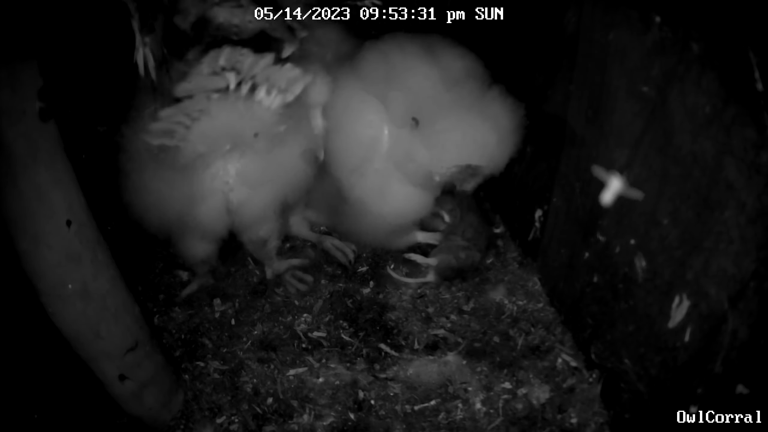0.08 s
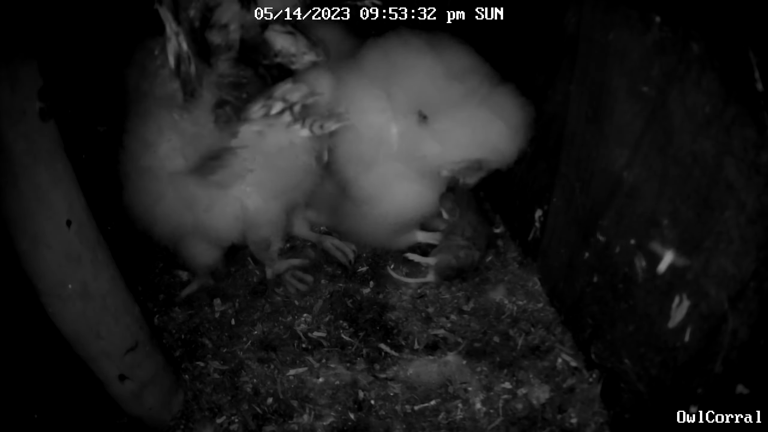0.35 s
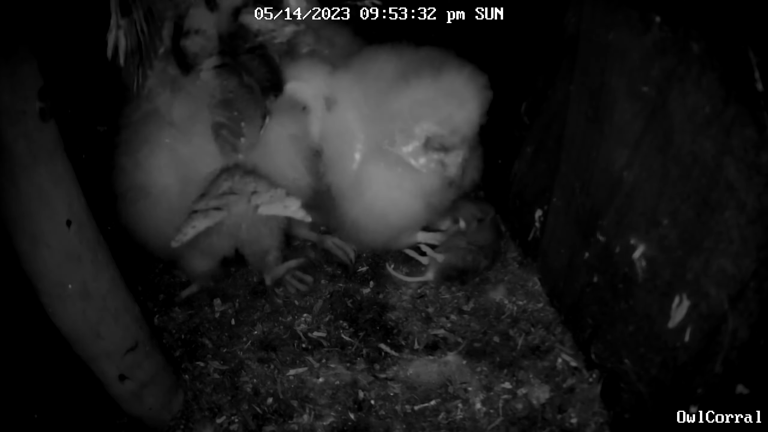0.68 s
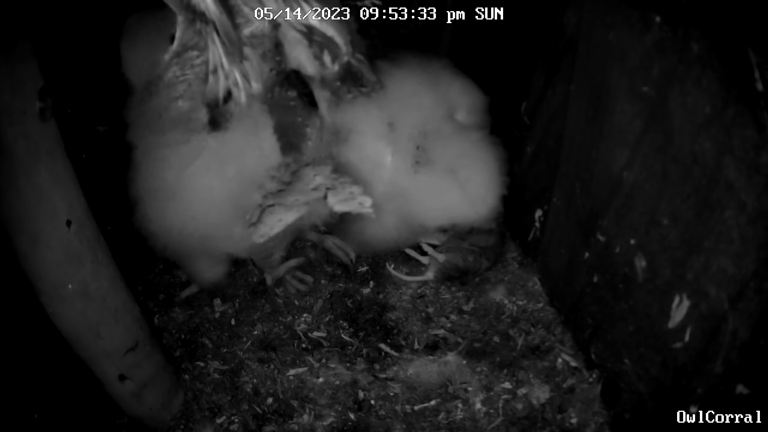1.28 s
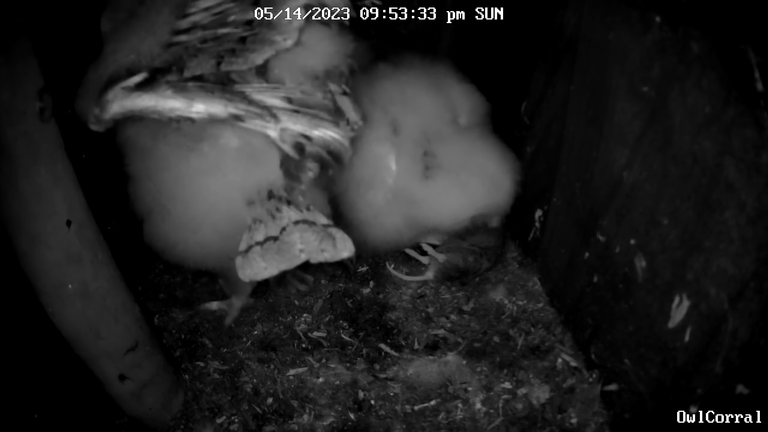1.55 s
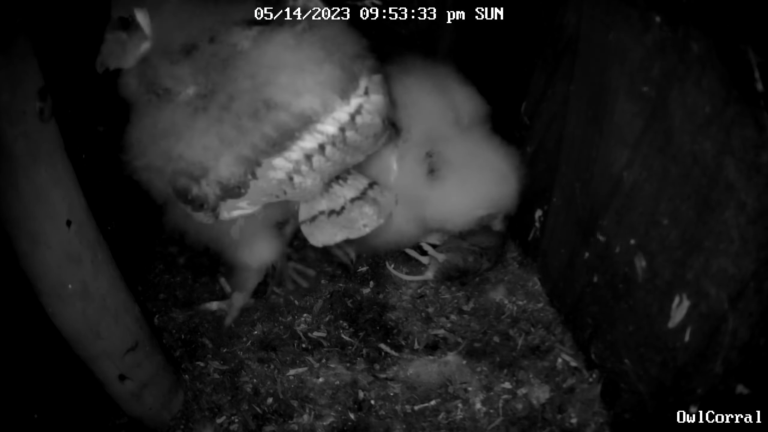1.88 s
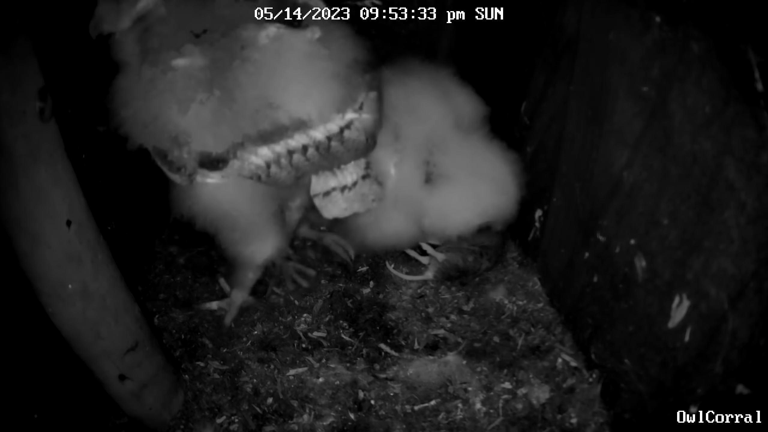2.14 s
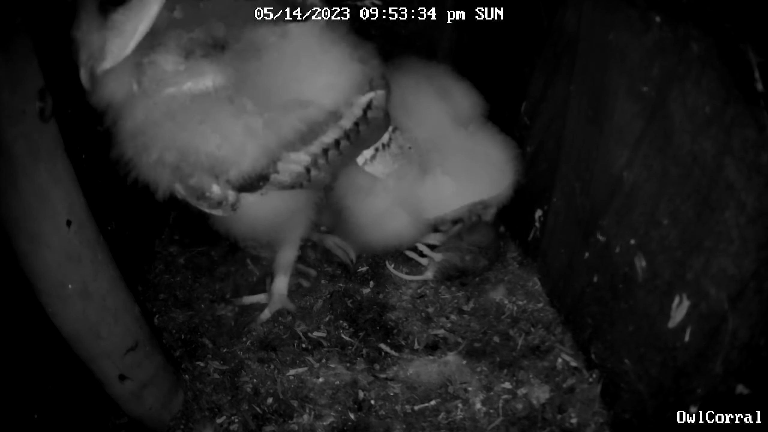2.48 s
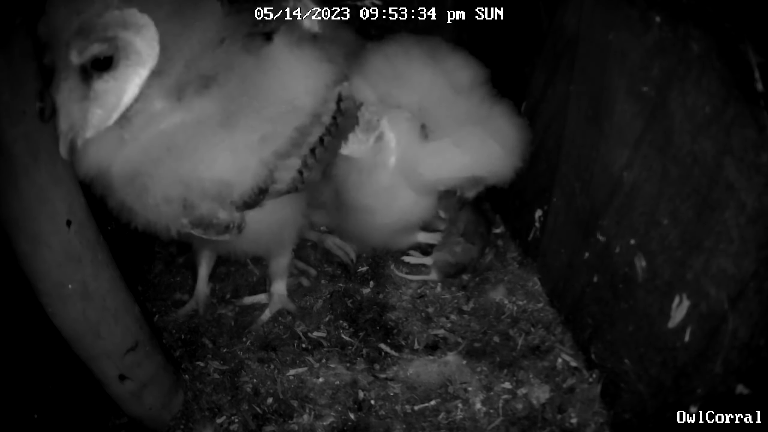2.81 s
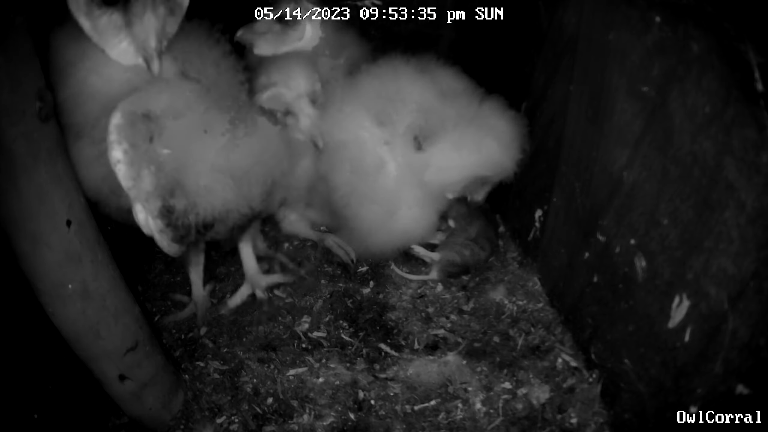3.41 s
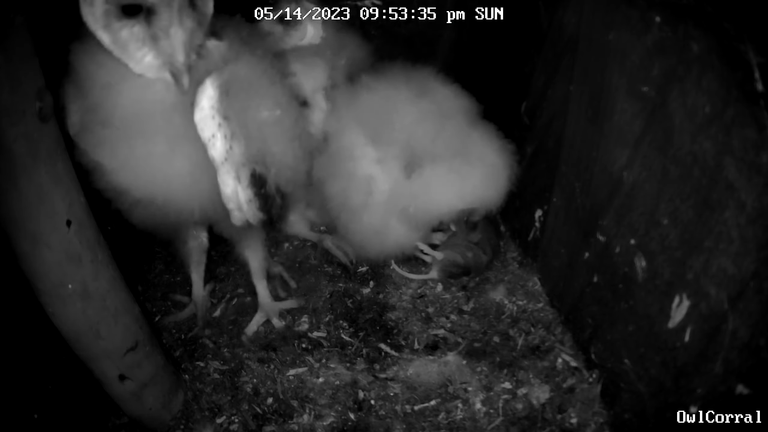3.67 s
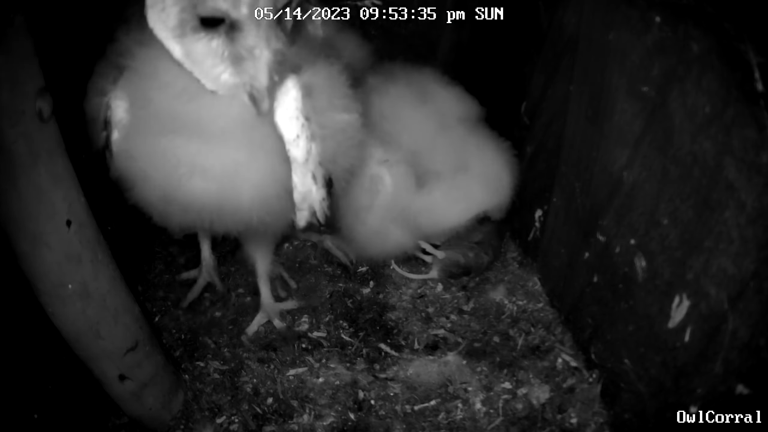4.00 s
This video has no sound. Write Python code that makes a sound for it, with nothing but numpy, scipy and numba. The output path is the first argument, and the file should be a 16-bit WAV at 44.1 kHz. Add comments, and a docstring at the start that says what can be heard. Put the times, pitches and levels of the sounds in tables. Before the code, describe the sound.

Heard close up in a wooden nest box, young owls make three breathy, rasping hisses: a brief shrill one, a longer shrill one that builds and stops sharply, then a hoarser one. Hollow thumps and small claw clicks are scattered around them as the birds shuffle, loudest in the middle. Faint, brief whistles and a soft low rumble lie underneath.

```python
"""Three rasping hisses: two barn owlets beg at night in a wooden nest box, close to a small microphone.
Each hiss is rough air ringing in the throat; its middle resonances sink as the beak shuts.
The box makes some pitches louder and others softer. Feet thump the floorboard and claws tick on it.
Brief whistles and thin rasps come and go, over a low rumble and a faint steady hiss."""
import sys
import numpy as np
from scipy import signal
from scipy.fft import rfft, irfft
from scipy.io import wavfile
from numba import njit

SR = 44100
rng = np.random.default_rng(int(sys.argv[2]) if len(sys.argv) > 2 else 0)


def unload_audio(sound):
    """Save the sound as a 16-bit wav file, at the path given as the first command line argument."""
    columns = np.transpose(np.atleast_2d(sound))
    # keep every value between -1 and 1, then stretch to whole-number steps
    steps = np.round(np.clip(columns, -1, 1) * 32767)
    wavfile.write(sys.argv[1], SR, steps.astype(np.int16))


N = 178119
T = np.arange(N) / SR


def undb(db):
    """Turn decibels into a number to multiply by."""
    return 10 ** (np.asarray(db) / 20)


def band_rms(x, lo_hz, hi_hz):
    """The average strength (rms) of x between two frequencies."""
    hz = np.fft.rfftfreq(len(x), 1 / SR)
    return np.std(irfft(rfft(x) * ((hz > lo_hz) & (hz < hi_hz))))


def butter(x, hz, kind, order=2):
    """Keep the lows, the highs or a band; a higher order cuts more sharply."""
    return signal.sosfilt(signal.butter(order, hz, kind, fs=SR, output="sos"), x)


def flutter(hz):
    """A random wobble of typical size 1, up to about hz times a second."""
    x = butter(rng.standard_normal(N), hz, "low")
    return x / x.std()


def add(out, start_s, sound):
    """Mix a short sound in at a given time."""
    i = int(np.clip(start_s * SR, 0, N - 1))
    out[i:i + len(sound)] += sound[:N - i]


@njit
def resonate(x, hz, width):
    """A resonance: it lets through the pitches near hz, and its centre and width can move."""
    y, band_state, low_state = np.empty(len(x)), 0., 0.
    for i in range(len(x)):
        tuning, damping = np.tan(np.pi * hz[i] / SR), width[i] / hz[i]
        band = (band_state + tuning * (x[i] - low_state)) / (1 + tuning * (tuning + damping))
        band_state = 2 * band - band_state
        low_state += 2 * tuning * band
        y[i] = damping * band
    return y


def blown(hz, width_hz):
    """Rushing air: noise through the same resonance twice, for a steep-sided band."""
    centre, span = hz * np.ones(N), width_hz * np.ones(N)
    return resonate(resonate(rng.standard_normal(N), centre, span), centre, span)


def background(drone_hz=111, boom_hz=82, boom_db=-8, rumble_db=-43, fade_db_per_s=4, air_db=-75):
    """Faint steady hiss and a low rumble that slowly fades, swelling when the birds shuffle."""
    # The tone of the steady noise. Each row: frequency in Hz, relative level in dB.
    air_curve = [(12, -32), (20, 0.5), (54, -18.5), (117, 5), (139, -8.5), (194, -34), (316, -22.5),
                 (397, -31), (715, -37.5), (6770, -47.5), (8970, -59.5), (11700, -95.5), (19700, -120)]
    # Soft shuffles. Each row: start in seconds, length in seconds, level in dB.
    shuffles = [(1.258, 0.23, -34.5), (1.427, 0.12, -36), (3.13, .18, -45), (3.418, 0.11, -48),
                (3.83, 0.13, -46)]
    hz, db = np.transpose(air_curve)
    bins_hz = np.fft.rfftfreq(N, 1 / SR)
    curve_db = np.interp(np.log(bins_hz + 1), np.log(hz), db)
    air = irfft(rfft(rng.standard_normal(N)) * undb(curve_db), N)
    rumble = blown(drone_hz, width_hz=18) + undb(boom_db) * blown(boom_hz, width_hz=23)
    swell = undb(rumble_db - fade_db_per_s * T)
    for start_s, length_s, shuffle_db in shuffles:
        add(swell, start_s, undb(shuffle_db) * np.hanning(int(length_s * SR)))
    return undb(air_db) * air / band_rms(air, 1000, 8020) + swell * rumble / rumble.std()


def thin_rasps(hz=2500, width_hz=330, flicker_db=4):
    """Very faint rasps between the calls: a narrow band of flickering noise swells and fades."""
    # Each row: start in seconds, length in seconds, level in dB.
    rasps = [(0.754, 0.25, -74), (2.125, 0.053, -71), (2.212, .1, -64.5), (3.556, 0.55, -81.5)]
    air = blown(hz, width_hz) * undb(flicker_db * flutter(30))
    swell = np.zeros(N)
    for start_s, length_s, db in rasps:
        add(swell, start_s, undb(db) * np.hanning(int(length_s * SR)))
    return swell * air / air.std()


def whistles(rough=0.15):
    """Brief sliding whistles, made husky by a wobble in pitch and loudness."""
    # Each row: start in seconds, length in seconds, first and last pitch in Hz, level in dB.
    glides = [(0.265, 0.026, 3570, 4550, -52.5), (0.324, 0.013, 4110, 3660, -46),
              (0.326, 0.087, 3860, 3750, -70), (2.336, 0.015, 4470, 4670, -63),
              (2.34, .025, 5630, 6750, -62.5), (1.255, 0.0264, 4580, 3920, -42.5),
              (1.265, 0.15, 4560, 4430, -41), (2.584, 0.021, 4800, 3100, -43)]
    out = np.zeros(N)
    for start_s, length_s, first_hz, last_hz, db in glides:
        n = int(length_s * SR)
        phase = 2 * np.pi * np.cumsum(np.linspace(first_hz, last_hz, n)) / SR
        tone = np.sin(phase + 2 * rough * flutter(99)[-n:])
        tone *= 1 + rough * flutter(300)[-n:]
        add(out, start_s, undb(db) * np.hanning(n) * tone)
    return out


def claws(scrape_s=0.0028, grit=0.37, crack=0.4, top_hz=3800, reach_hz=170):
    """A claw tip skids for a few milliseconds, making a tiny crack and ringing the wood."""
    # Claw strikes. Each row: start in seconds, peak level in dB, brightness in dB per octave.
    strikes = [(0.204, -37, 20), (0.227, -56, 11), (0.383, -44.5, 1.5), (0.449, -53, 16),
               (0.607, -30, -2.5), (0.904, -27, 0), (1.947, -52, 4), (2.173, -31, -8), (2.181, -30, -5.5),
               (2.189, -35, -14), (2.266, -38.5, 1), (2.509, -53.5, 3), (3.327, -46.5, 2.5),
               (3.338, -36, -22), (3.355, -43, -9), (3.364, -42.5, -7), (3.993, -52, 11.5)]
    # The wood's tones. Each row: pitch in Hz, relative level in dB, seconds to fade by 60 dB.
    wood_tones = [(709, -6.5, 0.065), (882, -11, 0.026), (1064, -1.5, 0.056), (1194, 3, 0.039),
                  (1540, 3, 0.026), (1780, -3.5, 0.012), (2055, 8, 0.0094), (2256, -5.5, 0.035),
                  (2607, 1.5, 0.014), (3010, 1, 0.012), (3760, -12.5, 0.051), (4250, -1.5, 0.0076)]
    out, t = np.zeros(N), T[:SR // 8]
    octaves = np.log2(np.clip(np.fft.rfftfreq(len(t), 1 / SR), 500, 8000) / 2000)
    for start_s, db, brightness in strikes:
        skid = grit * rng.standard_normal(len(t)) * np.exp(-t / scrape_s)
        skid[0] += 2  # the first hit
        ring = sum(np.sin(2 * np.pi * (hz * t + rng.random())) * undb(tone_db - 60 * t / fade_s)
                   for hz, tone_db, fade_s in wood_tones)
        ring += crack * butter(rng.standard_normal(len(t)), [800, 4500], "band") * undb(-60 * t / 0.015)
        tick = signal.fftconvolve(skid, ring)[:len(t)]
        tick = irfft(rfft(tick) * undb(brightness * octaves), len(t)) * np.linspace(1, 0, len(t))
        # a sharper contact reaches further into the treble
        cutoff_hz = min(top_hz + reach_hz * max(brightness, 0), 9000)
        tick = butter(tick, cutoff_hz, "low", order=6)
        add(out, start_s, undb(db) * tick / np.abs(tick).max())
    return out


def footfalls():
    """A padded foot pushes the floorboard; a shorter contact rings its higher tones."""
    # Steps. Each row: start in seconds, peak level in dB, contact time in milliseconds.
    steps = [(.182, -21.5, 1.74), (0.208, -25.5, 1), (0.234, -23, 2.9), (0.46, -34.5, 4.5),
             (.609, -22.5, 6.5), (0.907, -16.5, 8.3), (1.144, -46, 0.94), (1.948, -7.5, 7.2),
             (2.028, -22, 19.6), (2.181, -22, 1.66), (2.274, -19.5, 2.3), (2.445, -40.5, 2.6),
             (2.783, -18, 3.1), (2.789, -6, 7.9), (3.333, -21, 6.9), (3.434, -43, 15), (3.986, -25, 2.8),
             (3.999, -15, 5.7)]
    # The board's tones. Each row: pitch in Hz, relative level in dB, seconds to fade by 60 dB.
    board_tones = [(73, -15.5, 0.52), (90.2, -5, 0.26), (110.8, 0, 0.2115), (136.7, -1, 0.1),
                   (161.2, -8, 0.15), (237, -3.5, 0.083), (265.5, -6, 0.13), (308.9, 1, 0.089),
                   (395.4, -13, 0.16), (406, -21.5, 0.2), (459.6, -8.5, 0.13), (687, -11.5, 0.071)]
    out, t = np.zeros(N), T[:SR // 2]
    ring = sum(np.sin(2 * np.pi * hz * t) * undb(db - 60 * t / fade_s) for hz, db, fade_s in board_tones)
    ring = butter(ring, 65, "high", order=10)  # the small board gives no deep bass; its lows come late
    for start_s, db, contact_ms in steps:
        progress = t / (contact_ms / 1000)
        push = progress ** 2 * np.exp(-6 * progress)
        thump = signal.fftconvolve(ring, push)[:len(t)]
        add(out, start_s, undb(db) * thump / np.abs(thump).max())
    return out


def at_microphone(x, path, size=4096):
    """The ringing box lifts some pitches and dips others; the microphone softens the high treble."""
    hz = np.fft.rfftfreq(size, 1 / SR)
    curve_db = sum(db * np.exp(-((hz - centre_hz) / width_hz) ** 2) for centre_hz, width_hz, db in path)
    # turn the curve into a ring that follows the sound and never comes before it (minimum phase)
    cepstrum = irfft(np.log(undb(curve_db)))
    cepstrum[1:size // 2] *= 2
    cepstrum[size // 2 + 1:] = 0
    ring = irfft(np.exp(rfft(cepstrum)))
    return signal.fftconvolve(x, ring)[:N]


def breath(start_s, shut_s, tail_db, tail_s, attack_s=0.0042, swell_s=0.32, closing_s=0.055, stop_s=0.007):
    """Curves from 0 to 1: the bird pushes harder, holds, then shuts its beak and a little air leaks."""
    effort = np.clip(0.032 + (T - start_s) / swell_s, 1e-3, 1)
    closed = np.clip((T - shut_s) / closing_s + 1, 0, 1)
    stopped = np.clip((T - shut_s) / stop_s, 0, 1)
    onset = np.clip((T - start_s) / attack_s, 0, 1)
    tail = np.clip(1 - (T - shut_s) / tail_s, 0, 1) ** 0.71
    flow = onset * undb(tail_db * stopped) * tail
    return effort, closed * (flow > 0), stopped, flow


def hiss(throat, path, start_s, treble_on_s, shut_s, db, treble_db, grunt_db, tail_db, tail_s,
         sink_to_hz=1350, low_db=-44, shut_middle_db=-10, shut_treble_db=-19, leak_db=4, grunt_s=0.015):
    """One begging call: air rasps through the low, middle and high resonances of the throat."""
    effort, closed, stopped, flow = breath(start_s, shut_s, tail_db, tail_s)
    sink = 0.77 * closed ** 1.4
    drift = 1 + 0.006 * flutter(28)
    spurts = undb(0.16 * flutter(420))  # the airflow is slightly uneven

    def ring(resonances, pull=0):
        """Air through some resonances; the shutting beak pulls them down and widens them."""
        widen = 1 + 0.83 * pull
        air = sum(undb(level_db) * blown(drift * (hz + pull * (sink_to_hz - hz)), width_hz * widen)
                  for hz, width_hz, level_db in resonances)
        return spurts * air / np.sqrt(widen)

    def gain_for(air, level_db, band_hz):
        """The gain that brings a band of this air to a level at the microphone."""
        return undb(level_db) / band_rms(at_microphone(air, path), *band_hz)

    low, mouth, high = ring(throat[:1]), ring(throat[1:2], sink), ring(throat[4:])
    middle = ring(throat[2:3], sink) + (1 - sink) * ring(throat[3:4])
    middle_gain = gain_for(mouth + middle, db + shut_middle_db * closed, (1000, 3700))
    high_gain = gain_for(high, db + treble_db + shut_treble_db * closed, (3800, 9000))
    # the low resonances grow least with effort
    out = low * effort ** 0.14 * gain_for(low, low_db, (370, 600))
    out += (mouth * effort ** 0.55 + middle * effort) * middle_gain
    out += high * effort ** 0.97 * high_gain * undb(leak_db * stopped)  # leaking air sounds thinner
    # the narrowing throat grunts just as the beak shuts
    grunt = spurts * blown(420 * drift, width_hz=150)
    grunt_swell = np.exp(-((T - shut_s) / grunt_s + 0.5) ** 2)
    out += grunt * grunt_swell * gain_for(grunt, grunt_db, (370, 600))
    # the camera's sound is muffled above 4.6 kHz at first, then the treble switches on abruptly
    muffled = butter(out, 4600, "low", order=36)
    return at_microphone(flow * np.where(T < treble_on_s, muffled, out), path)


def owlets():
    """A shrill owlet and a hoarse one hiss, each from its own place in the box."""
    # Throat resonances. Each row: centre in Hz, width in Hz, relative level in dB.
    shrill_throat = [(355, 345, -17), (1605, 560, -11), (2450, 560, 0), (3050, 1100, -4), (4405, 200, 3),
                     (5125, 985, -3), (7030, 540, -6)]
    hoarse_throat = [(400, 375, -17), (1495, 440, -8), (2290, 475, 0), (3295, 770, -4), (4140, 1620, -12),
                     (5725, 1880, -13), (6830, 215, -8)]
    # The box's peaks and dips; the last row is the microphone's treble roll-off.
    # Each row: centre in Hz, width in Hz, lift or cut in dB.
    shrill_path = [(305, 35, 4), (475, 50, 6), (680, 35, -12), (840, 80, 9), (1010, 55, -2), (1180, 55, 9),
                   (1425, 40, -5), (1505, 55, 3), (1890, 50, -3), (2230, 55, 1), (2420, 60, -5),
                   (2685, 70, -14), (2975, 65, 4), (3115, 50, -5), (3195, 50, 4), (3395, 45, -10),
                   (3550, 55, 3), (3670, 50, -5), (3770, 55, 4), (3875, 50, 5), (4680, 70, 7),
                   (5175, 70, -7), (5840, 70, 7), (6335, 65, -6), (7200, 55, -7), (7845, 85, 11),
                   (8155, 80, 11), (9215, 865, -6)]
    hoarse_path = [(315, 35, 8), (470, 40, 6), (710, 50, -12), (855, 115, 10), (1045, 35, -5),
                   (1200, 35, 7), (1265, 45, -5), (1350, 55, 4), (1435, 50, -5), (1545, 70, 4),
                   (1900, 50, -4), (2715, 65, -16), (2925, 55, 2), (3095, 60, -6), (3745, 60, -4),
                   (3920, 65, 6), (4080, 60, -6), (4360, 55, -6), (5115, 55, 4), (5310, 55, 5),
                   (5450, 55, -8), (5840, 65, 6), (6475, 50, -9), (6655, 50, -6), (7375, 50, 5),
                   (7825, 90, 7), (8170, 80, 7), (9155, 820, -17)]
    # Each row: which owlet; when the call starts, the camera's treble switches on and the beak shuts,
    # in seconds; middle level, treble relative to it, grunt level and tail drop, in dB; tail in seconds.
    calls = [("shrill", -.33, -.27, 0.16, -20.5, 4, -34, -11, .052),
             ("shrill", 1.267, 1.329, 1.727, -21, .7, -43.5, -17, .076),
             ("hoarse", 2.594, 2.609, 3.049, -21, -4, -31.5, -10.5, 0.037)]
    birds = {"shrill": (shrill_throat, shrill_path), "hoarse": (hoarse_throat, hoarse_path)}
    return sum(hiss(*birds[name], *call) for name, *call in calls)


def scene():
    """Three hisses over the shuffling of feet, in one channel."""
    return (owlets() + footfalls() + claws() + whistles() + thin_rasps() + background())[None]


def record(dry, top_hz=8950):
    """The camera cuts off the highest treble sharply."""
    return signal.sosfilt(signal.ellip(10, .2, 80, top_hz, fs=SR, output="sos"), dry)


dry = scene()
out = record(dry)
unload_audio(out)
```